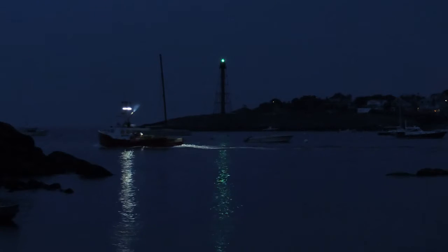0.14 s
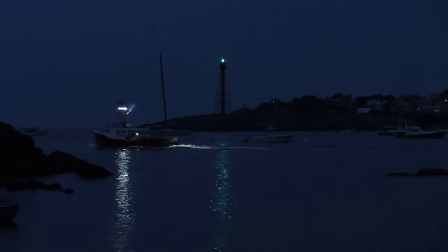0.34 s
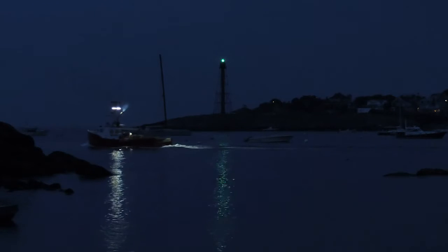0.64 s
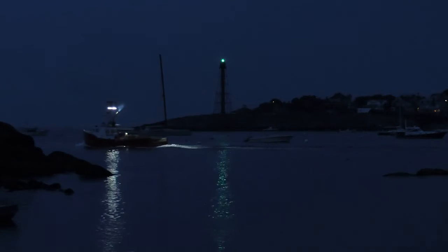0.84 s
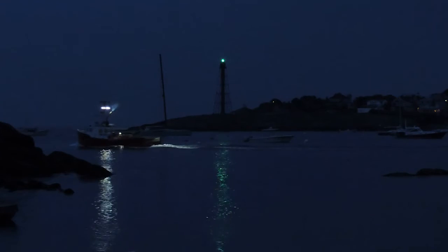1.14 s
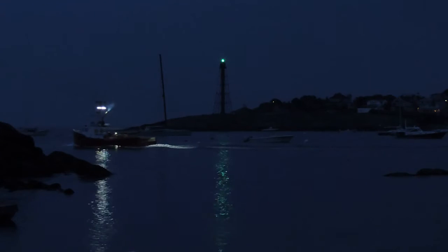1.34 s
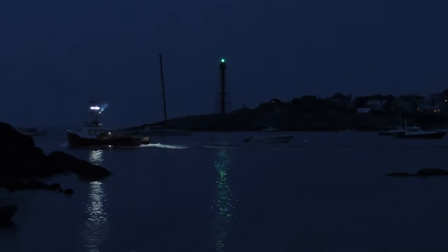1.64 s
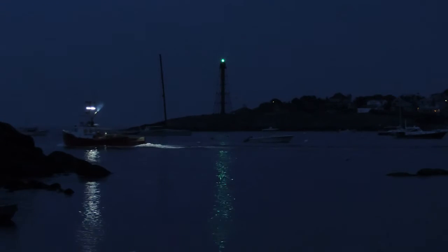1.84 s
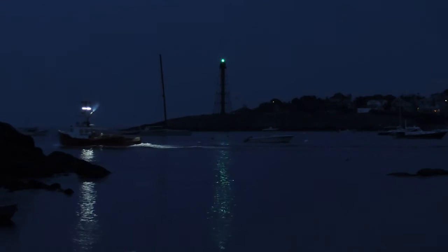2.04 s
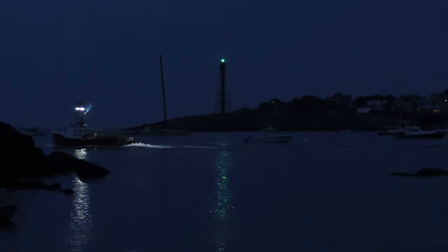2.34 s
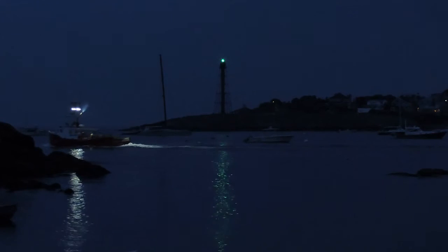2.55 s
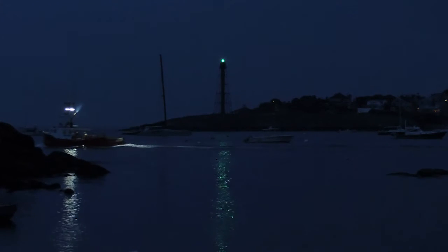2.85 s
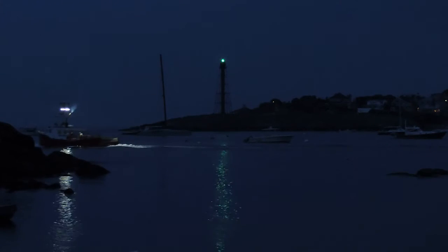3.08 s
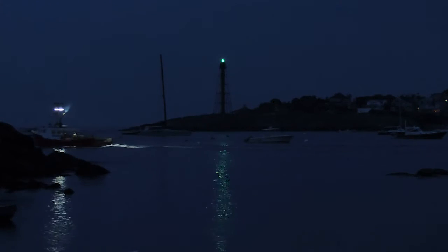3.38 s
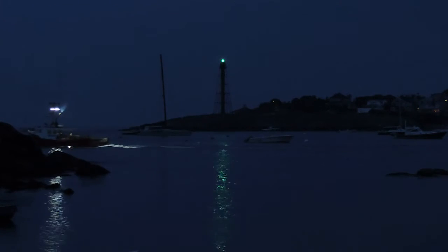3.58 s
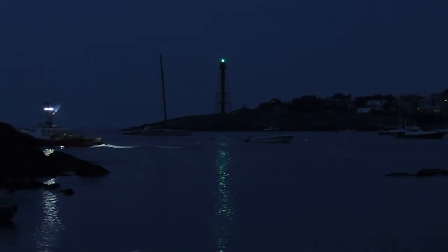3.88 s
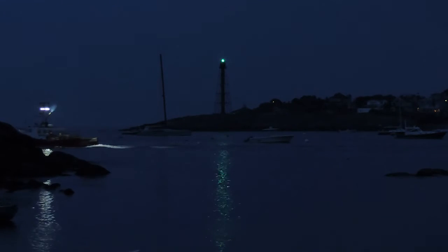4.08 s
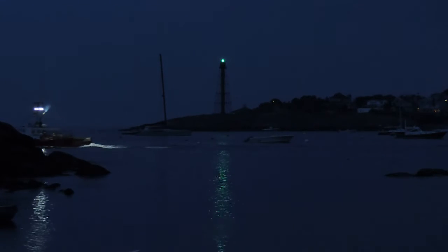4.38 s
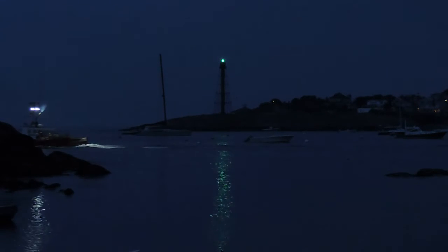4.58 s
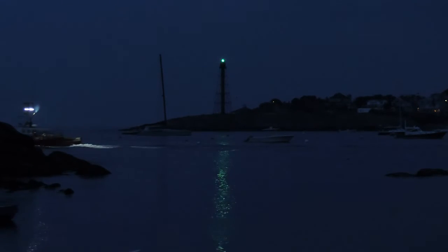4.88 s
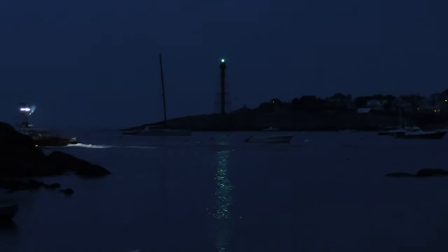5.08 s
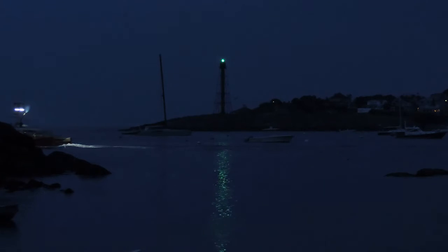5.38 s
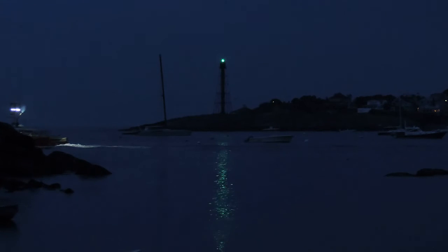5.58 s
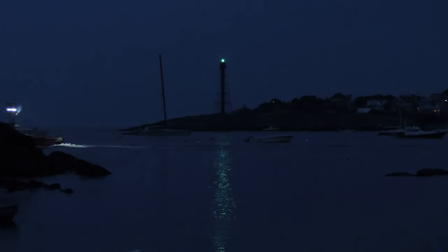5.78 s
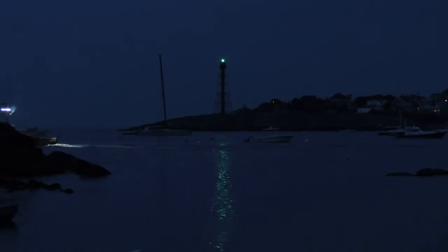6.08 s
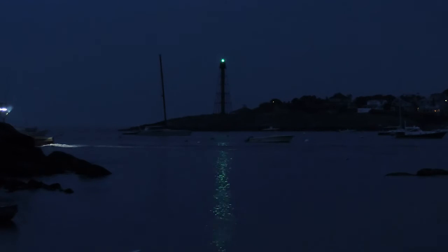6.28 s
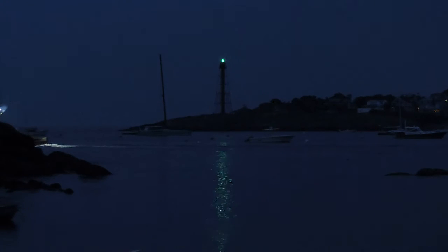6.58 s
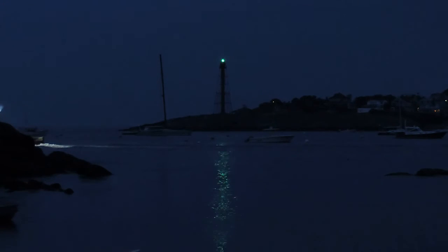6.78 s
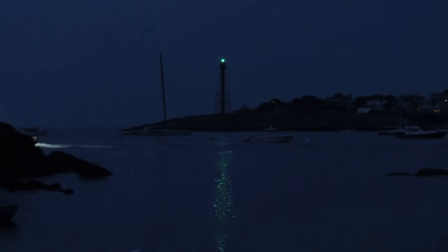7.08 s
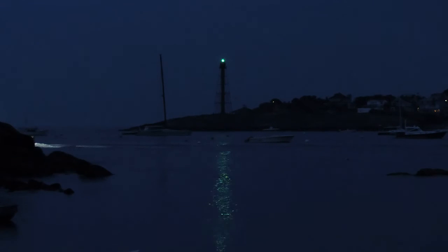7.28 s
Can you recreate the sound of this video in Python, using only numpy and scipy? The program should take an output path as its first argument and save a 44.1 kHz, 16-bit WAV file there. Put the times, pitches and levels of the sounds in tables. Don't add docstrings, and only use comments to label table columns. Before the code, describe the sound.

A stereo pair in the open air picks up a busy dawn chorus from trees ashore, lightly scattered and echoing. Beneath it a boat engine throbs steadily, drawing away. An insistent upward whistle slows and stops before 3 seconds, while other birds carry on. Blustery wind rumbles and pops separately on each side; a small hull knock and late, faint fizzing wash on rocks are almost hidden.

```python
import sys
import numpy as np
from scipy import signal
from scipy.fft import rfft, irfft, next_fast_len
from scipy.io import wavfile
from scipy.ndimage import uniform_filter1d, map_coordinates

SR = 44100
rng = np.random.default_rng(int(sys.argv[2]) if len(sys.argv) > 2 else 0)


def master_out(mix):
    frames = np.transpose(np.atleast_2d(mix))
    ceiling = np.clip(frames, -1, 1)
    pcm = np.round(ceiling * 32767).astype(np.int16)
    wavfile.write(sys.argv[1], SR, pcm)


def ratio_of_db(decibels):
    return 10 ** (np.asarray(decibels, float) / 20)


N = 327652


def unit(x):
    return x / np.sqrt(np.mean(x ** 2) + 1e-20)


def along(points, hz):
    f, value = np.transpose(points)
    return np.interp(np.log(hz + 1), np.log(f + 1), value)


def curves(rows):
    s, *columns = np.transpose(rows)
    return [np.interp(np.arange(N) / SR, s, column) for column in columns]


def wobble(rate):
    coarse = np.arange(0, N + 20, 20)
    knots = rng.standard_normal(int(N * rate / SR) + 4)
    return np.interp(np.arange(N), coarse, map_coordinates(knots, [coarse * rate / SR]))


def loudest(levels):
    t = np.arange(0, N / SR, 1 / 1000)
    return np.interp(np.arange(N) / SR, t, np.max(levels(t), axis=0))


def filtered(x, response):
    m = next_fast_len(N + SR // 2)
    return irfft(rfft(x, m) * response(np.fft.rfftfreq(m, 1 / SR)), m)[..., :N]


def hiss(spectrum, alike):
    mid, side = filtered(rng.standard_normal((2, N)), lambda hz: ratio_of_db(along(spectrum, hz)))
    turn = np.arccos(np.clip(alike, 0, 1)) / 2
    mid, side = np.cos(turn) * mid, np.sin(turn) * side
    return unit(np.array([mid + side, mid - side]))


def from_right(x, lag_s, pan_db):
    half = np.array([[1], [-1]]) / 2
    return filtered(x, lambda hz: ratio_of_db(half * pan_db) * np.exp(-2j * np.pi * hz * lag_s * half))


# [t/s, exhaust roar level/dB, firing hum level/dB]
BOAT_LEVELS = [
    (0.0, -41, -45),
    (3.1, -45, -45),
    (4.76, -46.5, -45),
    (7.43, -48.5, -47),
]
# [multiple of the cycle rate, level/dB]
ENGINE_ORDERS = [(5, -7.5), (6, -2.5)]
# [f/Hz, density/dB per Hz]
EXHAUST_SPECTRUM = [(12, -46), (25, 0.5), (70, -9.5), (130, -10.5), (300, -11), (600, -12.5), (1200, -18),
                    (2200, -25.5), (4000, -42)]


def boat():
    roar_db, hum_db = curves(BOAT_LEVELS)
    cycle_hz = 21 * (1 + 0.00629 * wobble(3))
    cycle = 2 * np.pi * np.cumsum(cycle_hz) / SR
    hum = sum(ratio_of_db(db + 2.2 * wobble(8)) * np.sin(k * cycle + .4 * wobble(12)) for k, db in ENGINE_ORDERS)
    throb = ratio_of_db(1.9 * np.sin(6 * cycle) + 0.59 * wobble(5.0))
    lean_left = ratio_of_db([[1.9], [-1.9]])
    roar = ratio_of_db(roar_db + 3.5) * throb * lean_left * hiss(EXHAUST_SPECTRUM, alike=0.65)
    return ratio_of_db(hum_db) * np.sqrt(2) * hum + roar


# [f/Hz, density/dB per Hz]
FAR_BIRDS_SPECTRUM = [(1410, -30.5), (2400, -11), (2930, -2.5), (3380, -6), (5230, -16), (6440, -13),
                      (10800, -18.5), (14100, -21.5)]


def far_birds():
    level_db = -36.5 + 1.84 * wobble(12) + 0.14 * phrases(HIGH_PHRASES)
    return ratio_of_db(level_db) * hiss(FAR_BIRDS_SPECTRUM, alike=0.15)


# [t/s, peak level/dB, time/s to build or sink by 15 dB]
LEFT_GUSTS = [(.13, -28, 0.09), (1.24, -32, .2), (1.49, -21, 0.21), (2.05, -31, 0.2019), (2.91, -34, 0.27),
              (3.08, -34, 0.02), (3.27, -21, 0.13), (3.37, -31, 0.01), (3.58, -26, 0.4), (3.85, -25, 0.07),
              (3.97, -19, 0.1121), (4.15, -19, 0.0618), (4.23, -15.5, 0.09), (4.34, -24, 0.036),
              (4.4, -18, 0.057), (4.56, -28, 0.09), (4.63, -26.5, 0.01), (4.69, -23.5, 0.09),
              (4.89, -23, 0.0768), (4.99, -16, 0.0645), (5.07, -21, 0.11), (5.18, -27.5, .06),
              (6.38, -28.5, 0.13), (6.81, -13.5, 0.04), (6.75, -31, 0.4546)]
RIGHT_GUSTS = [(.05, -26, 0.095), (.99, -24, 0.083), (1.15, -14.5, 0.066), (1.32, -19, 0.068),
               (1.44, -18, .11), (1.61, -20.5, .14), (1.88, -25, 0.203), (2.0, -16, 0.0572),
               (2.42, -36, .3), (2.7, -35, 0.159), (3.08, -15, 0.04626), (3.22, -25, .18),
               (3.37, -14, 0.029), (3.52, -15, 0.14), (3.72, -21.5, .08), (3.83, -22, 0.074),
               (3.955, -18, .09), (4.12, -19, 0.086), (4.22, -18, 0.0453), (4.29, -25, 0.0811),
               (4.41, -23.5, .075), (4.57, -24, .035), (4.69, -29, .15), (4.87, -25, 0.049),
               (4.95, -19, 0.079), (5.07, -30, 0.071), (6.69, -13.5, 0.039), (6.78, -13.5, 0.058),
               (6.89, -23, .07), (7.18, -34.5, 0.273)]
# [t/s, speed-up/dB, snap level/dB]
LEFT_WHIPS = [
    (1.482, 3, -17),
    (3.277, 2, -21),
    (3.589, 2, -25),
    (4.146, 2, -22),
    (4.222, 3, -14),
    (4.388, 3, -18),
    (4.986, 4, -12),
    (5.038, 3, -20),
    (6.802, 6, -8),
    (6.812, 5, -12),
]
RIGHT_WHIPS = [(1.118, 2, -20), (1.132, 2, -21), (1.151, 3, -13), (1.415, 2, -19), (1.463, 6, -11),
               (1.523, 5, -16), (1.542, 5, -16), (1.979, 6, -12), (2.003, 4, -9), (2.021, 3, -20),
               (2.036, 5, -15), (3.077, 4, -12), (3.093, 3, -22), (3.365, 6.5, -8), (3.381, 3, -18),
               (3.507, 3, -19), (3.522, 3, -21), (3.566, 4, -15), (3.578, 3, -19), (3.951, 6, -10),
               (3.966, 4, -15), (3.985, 3, -20), (4.072, 3, -22), (4.132, 4, -15), (4.964, 3, -21),
               (6.685, 5, -13), (6.704, 4, -18), (6.739, 4, -19), (6.763, 5, -13), (6.774, 3, -13),
               (6.791, 3, -19)]
# [f/Hz, density/dB per Hz]
EDDY_SPECTRUM = [(15, -15), (35, -1.5), (80, -0.5), (160, -4), (300, -16.5), (600, -38.5), (1200, -83)]


def buffet(gusts, whips):
    lull_drop_db, lull_db = 15, -47
    whip_s, whip_share = .012, .6
    t = np.arange(N) / SR
    at, peak_db, width = np.transpose(gusts)[..., None]
    gust_db = loudest(lambda t: peak_db - lull_drop_db * np.abs(t - at) / width)
    db = np.maximum(gust_db, lull_db) + 1.498 * wobble(40)

    def speed_ups(t):
        return [whip_share * up_db * np.interp(t - s, [-whip_s, 0, whip_s], [0, 1, 0]) for s, up_db, _ in whips]

    speed = ratio_of_db(.3 * (db + 24) + loudest(speed_ups))
    eddies = unit(filtered(rng.standard_normal(N), lambda hz: ratio_of_db(along(EDDY_SPECTRUM, hz))))
    passing = map_coordinates(eddies, [np.cumsum(speed) % (N - 1)], order=1)
    power = np.abs(uniform_filter1d(passing ** 2, size=SR // 25))
    wind = ratio_of_db(db) * passing / np.sqrt(power + 0.015)
    for s, up_db, snap_db in whips:
        wind[round((s - 1 / 20) * SR):][:SR // 10] += ratio_of_db(snap_db + 0.3) * snap(t[:SR // 10] - 1 / 20, up_db)
    return wind


def snap(t, up_db):
    pop_hz, pop_cycles = 170, .7
    edge_db, edge_ratio = -14.5, 2.1
    cycles = t * pop_hz * ratio_of_db(up_db)
    edge = ratio_of_db(edge_db) * np.sin(2 * np.pi * edge_ratio * cycles)
    return (np.sin(2 * np.pi * cycles) + edge) * np.exp(-(cycles / pop_cycles) ** 2)


def add(track, s, hz, gain, overtones_db):
    phase = 2 * np.pi * np.cumsum(hz) / SR
    partials = sum(ratio_of_db(db) * np.sin((k + 2) * phase) for k, db in enumerate(overtones_db))
    track[round(s * SR):][:len(hz)] += np.sqrt(2) * gain * (np.sin(phase) + partials)


def warbles(rows, bulge, edge, flutter_db):
    track = np.zeros(N + SR)
    quaver = 1 + .005 * flutter_db * wobble(110)
    for s, length, start_hz, end_hz, db in rows:
        u = np.linspace(0, 1, int(length * SR))
        hz = start_hz + (end_hz - start_hz) * u + bulge * (start_hz + end_hz) * 2 * u * (1 - u)
        hz = hz * quaver[round(s * SR):][:len(u)]
        swell = np.clip(np.minimum(u, 1 - u) / edge, 0, 1)
        add(track, s, hz, ratio_of_db(db) * swell, overtones_db=[-34])
    return track[:N] * ratio_of_db(flutter_db * wobble(140))


# [t/s,
# length/s, start f/Hz, end f/Hz, level/dB]
ARCHED_NOTES = [(.493, 0.0268, 3000, 3230, -38.5), (5.893, .03, 4000, 4200, -41),
                (1.527, .034, 3500, 2850, -32), (2.122, .03, 3500, 3750, -36),
                (2.233, .03, 3950, 4450, -33), (2.789, 0.053, 2420, 2750, -39.5),
                (3.314, 0.0323, 3800, 3460, -36), (4.112, .047, 2636, 3460, -38),
                (4.172, 0.03604, 2850, 3500, -39), (4.814, 0.037, 4250, 3800, -31.5),
                (5.318, 0.061, 2900, 2800, -42), (5.335, .046, 3800, 3600, -32),
                (5.595, 0.033, 3375, 2970, -32.5), (6.019, 0.039, 3440, 3300, -43),
                (6.706, .034, 3800, 4500, -35)]
DIPPED_NOTES = [
    (.155, .028, 3700, 3900, -37),
    (.395, 0.035, 3800, 3650, -36),
    (.643, 0.0255, 3628, 3440, -38),
    (3.362, 0.032, 3582, 3991, -32),
    (4.829, 0.0303, 3900, 3533, -37.5),
    (5.402, 0.026, 4400, 3490, -37),
    (5.787, .03, 3580, 2957, -35),
    (6.108, .095, 3120, 2520, -42),
    (1.452, .02, 3600, 3300, -35),
]
RISING_NOTES = [(.37, 0.022, 4800, 4700, -35), (.437, 0.03, 4200, 4714, -34), (1.037, .04, 4050, 4200, -32),
                (.915, .048, 3350, 4300, -37), (.21, .05, 3300, 3700, -35),
                (1.095, 0.044, 3300, 3829, -38.5), (1.828, .031, 3080, 3600, -36.5),
                (2.295, .022, 3400, 3900, -36), (1.422, .03, 2850, 3600, -35),
                (3.712, .048, 4000, 4280, -32), (2.16, .025, 3200, 4400, -39),
                (2.398, 0.0452, 4017, 4303, -29), (2.399, 0.035, 4600, 4730, -38),
                (2.914, .033, 4050, 4550, -37), (2.961, 0.0331, 3080, 3820, -38.5),
                (3.385, .018, 2969, 3240, -36.5), (3.484, 0.048, 3344, 3500, -36),
                (3.562, .044, 3559, 4120, -34.5), (3.778, .019, 3100, 3900, -36),
                (3.923, .05, 2950, 3150, -38), (5.297, 0.03923, 3170, 3595, -38.5),
                (5.379, 0.044, 3218, 3476, -41), (6.628, 0.0376, 3490, 3900, -37.5),
                (7.293, 0.049, 3650, 4240, -38.5)]
FALLING_NOTES = [(.25, 0.028, 3750, 3500, -35), (.45, .026, 3025, 2795, -35), (2.85, .04, 3750, 3200, -37),
                 (1.045, .017, 4640, 4526, -37), (1.255, .036, 3800, 3300, -35),
                 (1.245, .028, 4100, 4000, -35), (2.256, .022, 4700, 3400, -35),
                 (1.385, .022, 3850, 3100, -37), (1.958, .024, 3940, 3630, -42),
                 (1.998, 0.033, 3710, 2944, -42), (2.462, .035, 3400, 3450, -33),
                 (2.746, 0.017, 4174, 3830, -39), (5.01, .05, 4410, 3300, -39),
                 (2.991, 0.022, 3360, 3018, -35.5), (3.321, .022, 4590, 4340, -30.5),
                 (3.748, .02, 4000, 3000, -38), (.855, .04, 5150, 4300, -34), (4.24, .04, 4200, 3850, -41),
                 (6.4, .025, 3050, 2700, -39), (4.058, 0.053, 3886, 3280, -36),
                 (4.855, .075, 4100, 2900, -33.5), (6.736, .018, 4600, 3000, -36),
                 (6.775, .025, 2850, 4000, -37), (6.971, 0.055, 3710, 2880, -41),
                 (7.127, 0.045, 3764, 3407, -40.5)]
SHORT_GLIDES = [(0, .035, 2750, 2700, -39), (.125, .04, 4450, 4250, -40), (.198, .012, 4000, 5000, -40),
                (.215, .02, 5100, 4000, -40), (.56, .018, 4300, 4800, -42), (1.2, .03, 2900, 3200, -38),
                (1.258, .014, 8400, 10000, -52), (1.57, .02, 5000, 4900, -40), (1.6, .02, 2900, 3150, -37),
                (3.68, .015, 3300, 3100, -37), (3.87, .02, 3700, 3800, -41), (4.05, .022, 4500, 4350, -38),
                (4.14, .025, 3900, 4800, -42), (4.415, .025, 4000, 2800, -42),
                (4.455, .03, 3200, 2900, -42), (4.585, .025, 3650, 3850, -40),
                (4.635, .02, 4050, 4250, -40), (4.655, .03, 4000, 2400, -41), (5.15, .025, 3000, 2200, -43),
                (5.275, .03, 4200, 3500, -42), (5.345, .025, 4600, 4400, -38), (5.62, .03, 4200, 4400, -41),
                (5.69, .035, 2950, 3500, -39), (5.76, .04, 2850, 3400, -39), (5.765, .04, 4800, 4800, -45),
                (5.828, .025, 3700, 4800, -43), (5.91, .06, 2700, 3400, -42), (6.11, .025, 3700, 4000, -43),
                (6.18, .03, 4300, 4500, -43),
                (.645, .015, 3500, 3150, -39), (.69, .045, 2900, 3600, -42),
                      (.96, .015, 4300, 3700, -41), (2.135, .03, 4100, 3100, -41),
                      (2.335, .03, 2950, 3300, -41), (2.615, .025, 3000, 3800, -41),
                      (2.64, .02, 3500, 3000, -42), (2.75, .03, 3600, 2700, -43),
                      (2.835, .02, 2900, 2200, -43), (3.04, .04, 2700, 2500, -41),
                      (3.095, .025, 3250, 3250, -39), (3.125, .05, 3100, 2500, -42),
                      (3.18, .025, 3900, 3000, -41), (3.205, .025, 3100, 4300, -41),
                      (3.5, .035, 4800, 5100, -43), (3.6, .025, 3900, 4600, -42),
                      (6.258, .02, 3200, 3050, -37), (6.265, .02, 4100, 5000, -43),
                      (6.285, .02, 4800, 3700, -42), (6.35, .04, 2950, 3150, -39),
                      (6.48, .04, 2850, 3100, -41), (6.803, .03, 3400, 3300, -40),
                      (7.0, .055, 3200, 2900, -42), (7.36, .02, 3100, 3600, -41)]
# [t/s, length/s, start f/Hz, end f/Hz, level/dB]
FAR_ARCHED_NOTES = [
    (3.84, .055, 1750, 1800, -46),
    (5.555, .055, 1770, 1770, -47),
    (6.64, .055, 1750, 1800, -47),
    (.848, .022, 4100, 4900, -38),
    (1.229, .017, 4000, 4400, -39),
    (3.131, .03, 3750, 4140, -41),
    (6.905, .055, 4300, 3600, -45),
    (2.585, .04, 4300, 3700, -42),
    (2.03, .03, 4400, 4000, -40),
]
FAR_PLAIN_NOTES = [
    (4.53, .09, 3000, 2900, -46),
    (7.108, .02, 3750, 4100, -45),
    (4.628, .055, 2350, 2500, -40),
    (5.175, .028, 3500, 2700, -39),
    (5.205, .035, 2150, 2500, -43),
    (6.69, .038, 2400, 2520, -44),
    (6.555, .04, 2380, 2340, -45),
]


def soloists():
    arch, dip, glide = .14, -0.10054, 0.01497
    glides = RISING_NOTES + FALLING_NOTES + SHORT_GLIDES
    shapes = [(ARCHED_NOTES, arch), (DIPPED_NOTES, dip), (glides, glide)]
    clear = sum(warbles(rows, bulge, edge=0.2, flutter_db=3.0) for rows, bulge in shapes)
    far_shapes = [(FAR_ARCHED_NOTES, arch), (FAR_PLAIN_NOTES, 0)]
    soft = sum(warbles(rows, bulge, edge=0.1, flutter_db=0.3) for rows, bulge in far_shapes)
    rasp = 1 + .25 * wobble(450)
    return ratio_of_db(0.2) * clear * rasp + ratio_of_db(0.6) * soft + burrs()


# [f/Hz, t60/s]
TREES_T60 = [(1500, 0.19), (8000, 0.123)]


def trees(x):
    back, part = np.zeros((2, N + SR)), SR // 2
    for start in range(0, N, part):
        hz, t, z = signal.stft(rng.standard_normal((2, part)), SR, nperseg=256)
        decay = ratio_of_db(-60 * t / along(TREES_T60, hz)[:, None])
        tail = signal.istft(z * decay, SR, nperseg=256)[1]
        answer = signal.fftconvolve(x[None, start:start + part], tail / np.linalg.norm(tail[0]), axes=1)
        back[:, start + 200:][:, :answer.shape[1]] += answer
    return back[:, :N]


# [t/s, level/dB]
SLUR_TIMES = [(0.072, -30.5), (0.196, -32.5), (0.311, -33), (0.429, -34), (0.546, -32.5), (0.663, -31.5),
              (0.78, -32.5), (0.898, -34), (1.017, -35), (1.137, -36), (1.267, -31), (1.4, -31),
              (1.532, -30), (1.662, -32.5), (1.795, -33.5), (1.927, -32), (2.061, -31.5), (2.197, -31.5),
              (2.353, -34), (2.514, -35.5), (2.681, -35.5)]
# [t/time scales, f/Hz, level/dB]
PLAIN_SLUR = [
    (-2.3, 1500, -26),
    (-1.5, 1690, -15),
    (-0.7, 1930, -8),
    (0, 2330, 4),
    (0.39, 2700, 5.5),
    (0.75, 2880, 4.5),
    (1.15, 2830, 0),
    (1.7, 2700, -26),
]
# [t/time scales, f/Hz, level/dB]
HOOKED_SLUR = [
    (-2, 1500, -30),
    (-1.4, 1720, -16),
    (-0.63, 1950, -8.5),
    (0, 2300, 4),
    (0.4, 2750, 5.5),
    (0.7, 3080, 4),
    (1.2, 2920, -1),
    (2.1, 2600, -15),
]


def whistler():
    hooked_until_s = 1.2
    stretch, breath_s = .33, .075
    track = np.zeros(N + SR)
    times = np.transpose(SLUR_TIMES)[0]
    spacings = np.diff(times, prepend=2 * times[0] - times[1])
    for (s, db), spacing in zip(SLUR_TIMES, spacings):
        when, hz, level_db = np.transpose(HOOKED_SLUR if s < hooked_until_s else PLAIN_SLUR)
        scale = stretch * (spacing - breath_s)
        u = np.arange(when[0], when[-1], 1 / (scale * SR))
        gain = ratio_of_db(db - 1.1 + np.interp(u, when, level_db))
        add(track, s + when[0] * scale, np.interp(u, when, hz), gain, overtones_db=[-40, -36, -36])
    direct, wall_s = track[:N], 0.048
    wall = filtered(direct, lambda f: np.exp(-2j * np.pi * f * wall_s) * np.minimum(f / 2950, 1) ** 9)
    return direct + ratio_of_db(-7.5) * wall


def voices(middle_hz, count):
    song = np.zeros(N)
    for _ in range(count):
        bend = .14 * wobble(65)
        syllables = np.clip(wobble(34) - .1, 0, 1.5) ** 2
        syllables = syllables * ratio_of_db(4 * wobble(150) - 120 * bend ** 2)
        add(song, 0, middle_hz * np.exp(bend), syllables, overtones_db=[])
    power = np.abs(uniform_filter1d(song ** 2, size=SR // 12))
    return song / np.sqrt(power + 0.015 * np.mean(song ** 2))


def phrases(rows):
    swell_db_per_s, fade_db_per_s, pause_db = 500, 251, -56.5
    s, length, db = np.transpose(rows)[..., None]

    def each(t):
        before, after = np.maximum(s - t, 0), np.maximum(t - s - length, 0)
        return db - swell_db_per_s * before - fade_db_per_s * after

    return np.maximum(loudest(each), pause_db)


# [t/s, length/s, level/dB]
LOW_PHRASES = [(.14, .58, -36), (.91, .6, -36), (1.5, .3, -45.5), (1.81, .56, -38.5), (2.45, .05, -34.5),
               (2.5, .82, -38), (3.42, .92, -39.5), (4.42, .04, -40), (4.6, .16, -37.5), (4.87, 0.069, -33),
               (4.93, .4, -41.5), (5.33, .09, -34), (5.59, 1.19, -37), (6.97, .03, -48), (7.13, .04, -42),
               (7.28, .15, -38)]
HIGH_PHRASES = [(.12, .54, -39), (.855, .03, -34.5), (.92, 0.17, -42.5), (1.25, 0.065, -36.5),
                (1.55, .25, -40.5), (1.82, 0.555, -42), (2.4, 0.033, -34), (2.7, .9, -42), (3.7, .05, -38),
                (3.86, .32, -41), (4.43, .04, -45), (4.61, .05, -42), (4.79, 0.0374, -31),
                (4.85, 0.568, -42.5), (5.58, 0.05, -34.5), (5.65, 1.08, -42), (7.28, .15, -37)]


def crowd():
    high = voices(4250, count=6) + ratio_of_db(-8.5) * voices(5400, count=2)
    low_db = phrases(LOW_PHRASES) + 1.45 * wobble(7)
    high_db = phrases(HIGH_PHRASES) + 2.1 * wobble(7)
    return ratio_of_db(low_db - 5.3) * voices(3300, count=5) + ratio_of_db(high_db - 4.6) * high


# [t/s, length/s, start f/Hz, end f/Hz, level/dB]
CHIRRUPS = [(.6, .035, 6200, 6800, -50), (1.5, .03, 4600, 5000, -44), (1.61, .05, 3700, 3600, -40),
            (3.69, .025, 5000, 6000, -48), (3.895, .07, 3900, 4200, -39), (3.9, .06, 5200, 7000, -48),
            (4.79, .04, 4000, 4700, -38), (4.83, .11, 4500, 2900, -35), (5.04, .06, 4600, 4900, -46),
            (5.54, .07, 4500, 5100, -41), (5.875, .04, 3250, 3800, -38), (6.02, .07, 3700, 3300, -39)]


def burrs():
    buzz_hz = 700
    return warbles(CHIRRUPS, 0, edge=.3, flutter_db=2.5) * wobble(buzz_hz)


# [t/s, f/Hz, t60/s, level/dB]
HULL_KNOCK = (2.916, 800, .045, -28)


def knock():
    s, hz, t60, db = HULL_KNOCK
    t = np.maximum(np.arange(N) / SR - s, 0)
    return ratio_of_db(db - 60 * t / t60) * np.sin(2 * np.pi * hz * t)


# [t/s, level/dB]
WASH_LEVELS = [
    (0, -70),
    (5.25, -66),
    (5.55, -53.5),
    (6.6, -55),
    (7.1, -64),
    (7.43, -66),
]
# [f/Hz, density/dB per Hz]
FOAM_SPECTRUM = [(600, -30), (1000, -6), (1500, 0), (2000, -4), (2800, -30)]


def wash():
    return ratio_of_db(curves(WASH_LEVELS)[0] + 1.5 * wobble(6)) * hiss(FOAM_SPECTRUM, alike=.7)


def scene():
    near, many, slurs = soloists(), crowd(), whistler()
    direct = from_right(near + many, lag_s=7.6e-5, pan_db=-.4) + from_right(slurs, lag_s=9e-5, pan_db=5.5)
    scatter = trees(ratio_of_db(-5.5) * near + ratio_of_db(-3) * many + ratio_of_db(-14) * slurs)
    wind = np.array([buffet(LEFT_GUSTS, LEFT_WHIPS), buffet(RIGHT_GUSTS, RIGHT_WHIPS)])
    return direct + scatter + far_birds() + boat() + wash() + knock() + wind


def roll_off(x):
    return signal.sosfilt(signal.butter(12, 14280, fs=SR, output="sos"), x)


def record(dry):
    lead = 338
    pair = np.array([dry[0] + dry[1], dry[0] - dry[1]]) / 2
    pair = np.pad(pair, ((0, 0), (lead, 0)))
    hz, _, z = signal.stft(pair, SR, window="cosine", nperseg=2048)
    usual = np.sqrt(np.abs(uniform_filter1d(np.abs(z[0]) ** 2, size=24, axis=0)))
    luck = unit(uniform_filter1d(rng.standard_normal(z[:, ::32].shape), size=2))
    luck = np.repeat(luck, 32, axis=1)[:, :len(hz)]
    step = ratio_of_db(5.5 * luck + [[[0]], [[2]]])
    treble = along([(5000, 0), (7800, 1.05), (13000, 1.4)], hz)[:, None]
    kept = np.abs(z) > usual * step * treble
    mid, side = signal.istft(z * kept, SR, window="cosine", nperseg=2048)[1][:, lead:N + lead]
    return roll_off(np.array([mid + side, mid - side]))


dry = scene()
out = record(dry)
master_out(out)
```